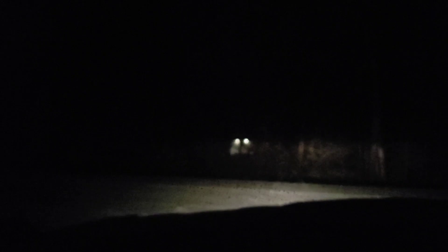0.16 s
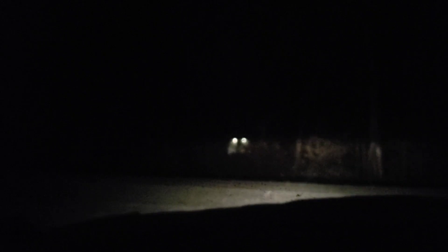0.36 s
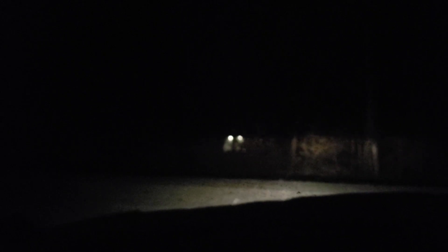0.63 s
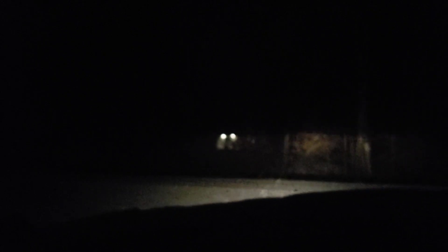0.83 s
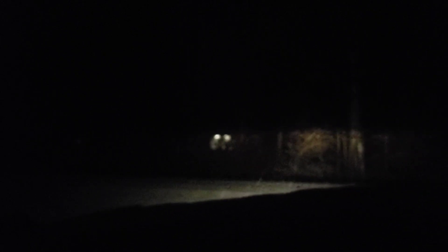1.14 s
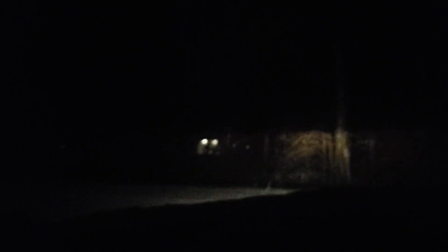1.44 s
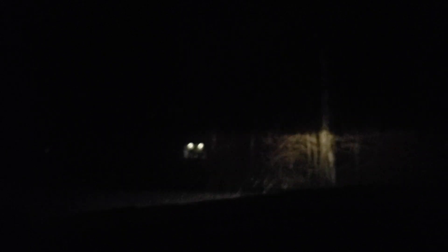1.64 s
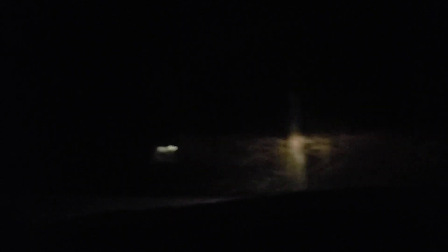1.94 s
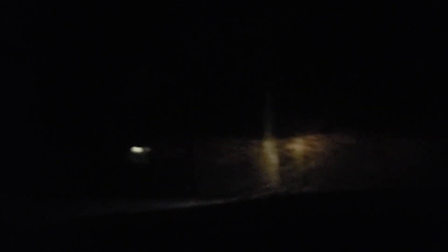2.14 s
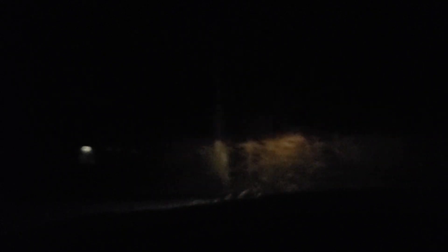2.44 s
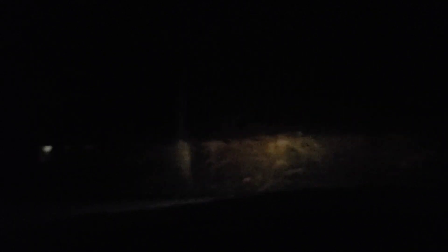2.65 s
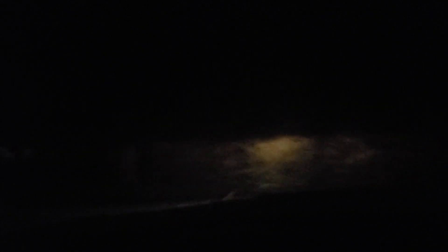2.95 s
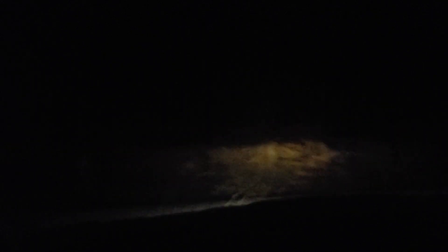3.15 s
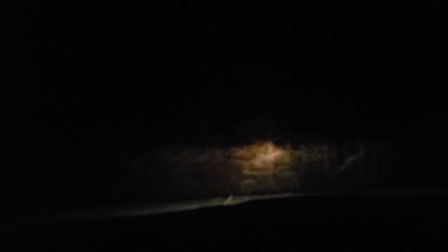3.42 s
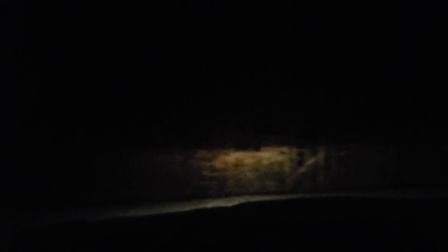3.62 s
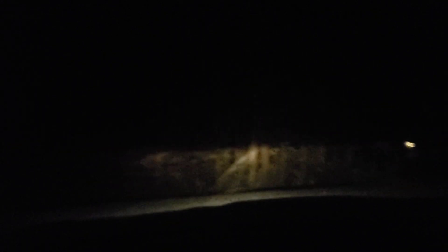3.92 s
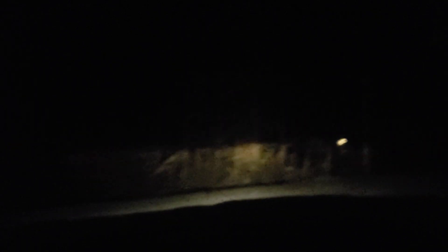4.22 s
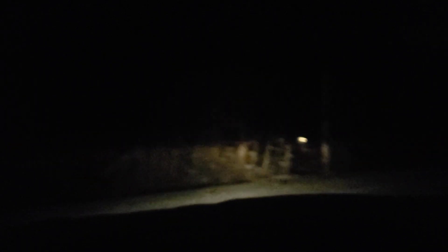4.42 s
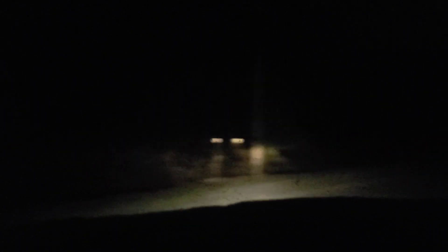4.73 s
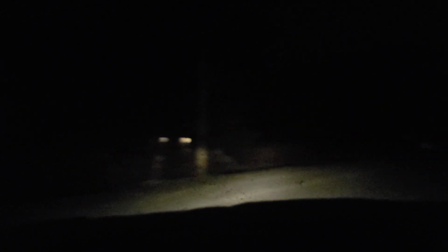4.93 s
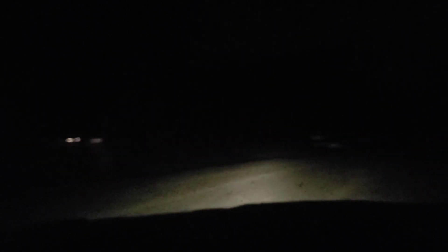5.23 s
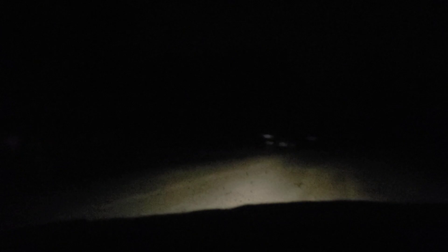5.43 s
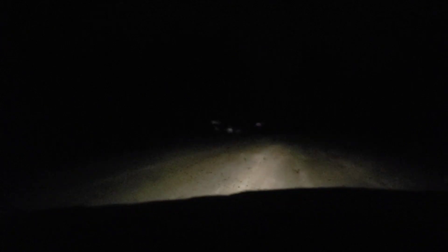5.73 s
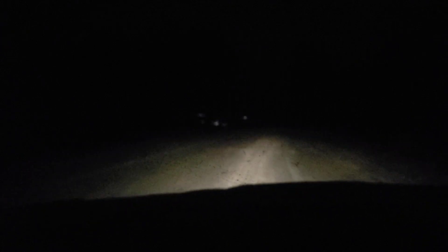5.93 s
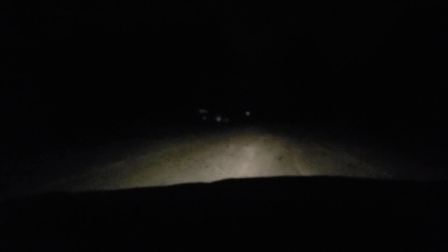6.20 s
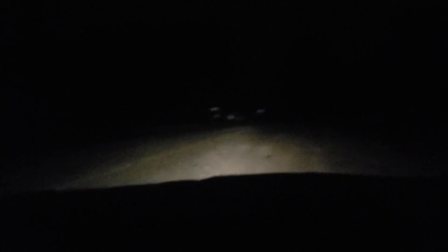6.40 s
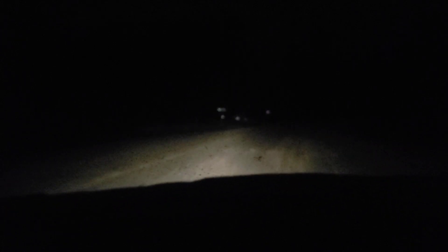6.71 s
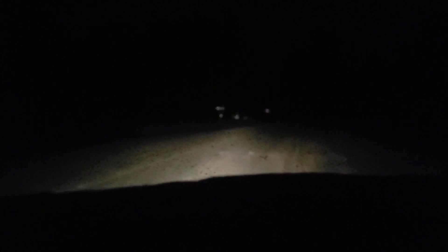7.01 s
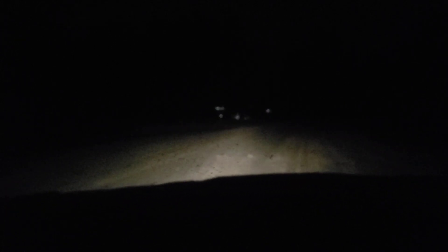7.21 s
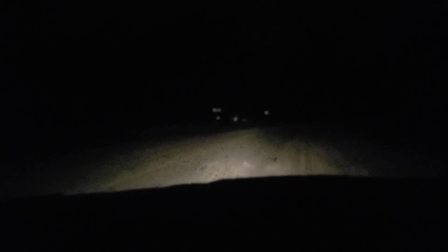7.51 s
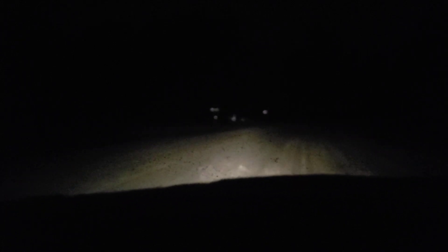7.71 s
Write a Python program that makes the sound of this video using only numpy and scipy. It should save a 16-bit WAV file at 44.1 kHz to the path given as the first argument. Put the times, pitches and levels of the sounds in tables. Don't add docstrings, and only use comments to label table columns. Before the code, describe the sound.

Muffled cabin sound of tyres rumbling and crunching over rutted snow, body thuds, light sleeve rustles, and a sudden hard clatter near five seconds.

```python
import sys
import numpy as np
from scipy import signal
from scipy.fft import rfft, irfft, next_fast_len
from scipy.io import wavfile
from scipy.ndimage import uniform_filter1d

SR = 44100
rng = np.random.default_rng(int(sys.argv[2]) if len(sys.argv) > 2 else 0)


def pcm_store(signal):
    levels = np.round(np.clip(np.atleast_2d(signal), -1, 1) * 32767)
    wavfile.write(sys.argv[1], SR, levels.astype(np.int16).T)


def volts_from_decibels(level):
    exponent = np.asarray(level, float) / 20
    return 10 ** exponent


N = 346626
TIME_S = np.arange(N) / SR
COARSE_S = np.arange(0, N + 40, 40) / SR
LEFT_RIGHT = np.array([[1], [-1]])


def rms_one(x):
    return x / np.sqrt(np.mean(x ** 2) + 1e-20)


def in_time(rows):
    times, *columns = np.transpose(rows)
    return [np.interp(TIME_S, times, column) for column in columns]


def at_hz(points, hz):
    table_hz, values = np.transpose(points)
    return np.interp(np.log(hz), np.log(table_hz), values)


def drift(rate, at=None):
    r = np.exp(-80 * np.pi * rate / SR)
    noise = rng.standard_normal(N // 40 + 2002)
    slow = signal.lfilter([1], [1, -2 * r, r * r], noise)[2000:]
    samples = np.arange(N) if at is None else at
    return np.interp(samples / 40, np.arange(len(slow)), rms_one(slow))


def swells(rows):
    power = 0
    for s, rise, fall, db in rows:
        away = np.where(COARSE_S < s, (s - COARSE_S) / rise, (COARSE_S - s) / fall)
        power = power + volts_from_decibels(2 * db - 40 * away)
    return np.interp(TIME_S, COARSE_S, 10 * np.log10(power + 1e-14))


def strokes(rows, rest_db):
    edge = 3 * .05
    each = []
    for s, length, a, b in rows:
        corners = [s - edge, s, s + length, s + length + edge]
        each.append(np.interp(COARSE_S, corners, [a - 60, a, b, b - 60]))
    return np.interp(TIME_S, COARSE_S, np.maximum(np.max(each, axis=0), rest_db))


def fade(rows, s):
    first, last = rows[0], rows[-1]
    return [(first[0] - s, first[1], -100)] + list(rows) + [(last[0] + s, last[1], -100)]


def glides(rows, edge):
    points = []
    for s, length, from_hz, to_hz, db in rows:
        points += fade([(s, from_hz, db), (s + length, to_hz, db)], edge)
    return in_time(points)


def resonate(x, hz, width_hz):
    r = np.exp(-np.pi * width_hz / SR)
    top = np.array([1, 0, -1]) * (1 - r * r) / 2
    return signal.lfilter(top, [1, -2 * r * np.cos(2 * np.pi * hz / SR), r * r], x)


def tone(hz, wobble, rate):
    turns = np.cumsum(hz * (1 + wobble * drift(rate))) / SR
    return np.sqrt(2) * np.sin(2 * np.pi * turns)


def grit(grain_db, per_s, count=N):
    strength = volts_from_decibels(grain_db * np.minimum(rng.exponential(1, (2, count)), 4))
    sizes = strength * rng.standard_normal((2, count))
    return sizes * (rng.random((2, count)) < per_s / SR) + 1e-9


# f/Hz, likeness (1 same, -1 opposite)
CABIN_LIKENESS = [(60, 0.88), (130, 0.96), (290, 0.71), (640, 0.65), (1410, -0.32), (3100, 0.24),
                  (6820, -0.27), (15000, 0.2)]
# f/Hz, level/dB
LEFT_LEAN = [(60, 2.4), (700, 2), (1300, 1), (2400, 3.5), (4400, 4.5), (8000, 3), (12000, -2), (15000, 2)]


def spread(mid, side, hz, likeness=CABIN_LIKENESS):
    alike = np.clip(at_hz(likeness, hz), -1, 1)
    lean = volts_from_decibels(at_hz(LEFT_LEAN, hz) / 2 * LEFT_RIGHT)
    return lean * (np.sqrt(1 + alike) * mid + np.sqrt(1 - alike) * side * LEFT_RIGHT)


def coloured(source, spectrum, patchy_db, flicker, likeness=CABIN_LIKENESS):
    count = source.shape[1]
    size = next_fast_len(count)
    low_hz, high_hz = spectrum[0][0], spectrum[-2][0]
    short = min(size, 2 * next_fast_len(int(2 * high_hz * size / SR)))
    hz = np.arange(1, short // 2 + 2) * SR / size
    at = np.arange(short) * size / short
    mid, side = rfft(source, size)[:, :len(hz)]
    shaped = volts_from_decibels(at_hz(spectrum, hz)) * spread(mid, side, hz, likeness) * (hz > low_hz)
    shaped = shaped.astype(np.complex64)
    out, together, place = 0, drift(flicker, at), 2 * np.log2(hz)
    for centre in np.arange(2 * np.log2(low_hz), 2 * np.log2(high_hz) + 1):
        share = np.clip(1 - abs(place - centre), 0, 1).astype(np.float32)
        band = irfft(shaped * share, short)
        out = out + volts_from_decibels(patchy_db * (together + drift(flicker, at))) * band
    return rms_one(irfft(rfft(out), size)[:, :count])


# t/s, level/dB
TYRE_LOAD = [(0.0, -57), (0.92, -57), (2.21, -48), (2.53, -49), (2.83, -53), (3.06, -54), (3.5, -49),
             (3.9, -55), (4.18, -56), (4.65, -48), (4.91, -50), (5.5, -51), (5.92, -53.5), (6.35, -58),
             (6.8, -55), (7.51, -57), (7.7, -54)]


def load_db():
    crunch_db, = in_time(TYRE_LOAD)
    return crunch_db - crunch_db.mean()


# t/s, half length/s, extra level/dB
ROUGH_PATCHES = [
    (1.913, 0.051, 6),
    (3.508, 0.058, 1),
    (4.52, 0.052, 3),
    (5.421, 0.025, 4),
    (6.6, .1, 2),
    (5.18, .1, 3),
    (7.841, .03, 3),
]


def rut_db():
    return sum(db * np.exp(-((TIME_S - s) / half) ** 2) for s, half, db in ROUGH_PATCHES)


# t/s, peak level/dB, f/Hz, time to fall 20 dB/s
SHELL_JOLTS = [(.03, -41, 45, .2), (.53, -37, 53, .3), (1.1, -38, 60, .3), (1.35, -32, 56, .2),
               (1.47, -22, 56, .2), (1.77, -17, 60, .06), (1.95, -27, 55, .3), (2.12, -23, 52.5, .12),
               (2.28, -16, 42.3, .06), (2.43, -20, 47, .14), (2.65, -16, 50, .15), (3.02, -30, 57, .2),
               (3.33, -33, 55, .1), (3.48, -16, 56, .2), (3.59, -20, 56, .18), (3.88, -19, 50, .08),
               (4.01, -23, 50.5, .2), (4.33, -20, 52.5, .07), (4.42, -22, 49, .05), (4.72, -22, 43.5, .3),
               (4.78, -15, 43.6, .4), (4.85, -19, 44.5, .1), (4.97, -19, 51.5, .14),
               (5.19, -16.5, 49.5, .22), (5.5, -23, 51, .1), (6.2, -34, 56, .3), (6.55, -29, 64, .3),
               (7.16, -27, 62, .2), (7.5, -28, 56, .3), (7.68, -27, 50.5, .3)]


def body_boom():
    hz, = in_time([(s, hz) for s, db, hz, fall in SHELL_JOLTS])
    jolts_db = swells([(s, .055, fall, db) for s, db, hz, fall in SHELL_JOLTS])
    between_db = -41 + 1.2 * load_db()
    level = volts_from_decibels(jolts_db) + volts_from_decibels(between_db)
    bounce = rms_one(resonate(resonate(rng.standard_normal(N), 36, 7.1), 36, 7.1))
    drumming = tone(hz, 0.0874, 15.2) + volts_from_decibels(-6.5) * bounce
    return spread(level * volts_from_decibels(-5.5) * drumming, 0, hz=50)


# f/Hz, level/dB per Hz
RUMBLE_COLOUR = [(12, -41), (20, -12), (38, -12), (58, 1.5), (107, -2), (161, -11), (193, -14.5),
                 (262, -28.5), (300, -27.5), (390, -35.5), (660, -120)]
# f/Hz, level/dB per Hz
CRUNCH_COLOUR = [(110, -30.5), (180, -2), (297, -9.5), (339, -17), (371, -12), (490, -18), (564, -15),
                 (704, -22.5), (815, -20.5), (950, -31), (1240, -62.5), (2090, -120)]
# f/Hz, width/Hz, level/dB
CABIN_MODES = [(194.5, 11, -6.5), (303.3, 5.3, -7.5), (560, 40, -9), (812, 34, -1)]


def tyres():
    rumble_db = -34.5 + .6 * load_db()
    rumble = coloured(rng.standard_normal((2, N)), RUMBLE_COLOUR, patchy_db=0.78, flicker=9)
    crunch_db, = in_time(TYRE_LOAD)
    crunch = coloured(grit(1.5, 8000), CRUNCH_COLOUR, patchy_db=-0.3, flicker=28)
    crunch = crunch + sum(volts_from_decibels(db + 3.5) * resonate(crunch, hz, width) for hz, width, db in CABIN_MODES)
    return volts_from_decibels(rut_db()) * (volts_from_decibels(rumble_db) * rumble + volts_from_decibels(crunch_db + 7.5) * rms_one(crunch))


# f/Hz, level/dB per Hz
HISS_COLOUR = [(590, -26), (1000, 3), (1530, -24), (1870, -11.5), (3040, -11), (4010, -6), (4450, -19),
               (6750, -19), (8410, -27), (12000, -17), (15200, -14.5), (15900, -26)]
# f/Hz, width/Hz, level/dB
DUCT_NOTES = [(1855, 230, -88), (4000, 260, -86.5), (1140, 45, -88), (715, 70, -70)]


def vents():
    out = volts_from_decibels(-78.5) * coloured(rng.standard_normal((2, N)), HISS_COLOUR, patchy_db=.3, flicker=5)
    air = rng.standard_normal((2, N))
    for hz, width, db in DUCT_NOTES:
        breath = rms_one(resonate(resonate(air, hz, width), hz, width))
        out = out + volts_from_decibels(db + 2.5 * drift(3)) * breath
    return out


# t/s, f/Hz, level/dB
ENGINE_NOTE = [(.68, 92, -42), (1.74, 95.5, -36), (1.96, 86, -32), (2.07, 89, -34), (2.2, 104, -39),
               (2.3, 110, -40), (2.47, 117.3, -34), (2.65, 111, -34), (2.8, 97, -39), (3.14, 86, -47),
               (3.38, 110, -41), (3.5, 117.3, -39), (3.63, 112, -45), (4.08, 75, -41), (4.37, 88, -37.5),
               (4.52, 112, -35), (4.69, 131, -36), (5.01, 118, -40), (5.4, 126, -40), (5.55, 125, -43),
               (5.7, 120, -43), (5.9, 110.5, -42), (6.04, 107.5, -42), (6.2, 91, -43)]
# start t/s, length/s, level/dB
PUMP_WHINES = [
    (2.02, .76, -58.5),
    (3.2, .54, -59),
    (5.1, .4, -66),
    (5.5, .64, -60.5),
]
# start t/s, length/s, from f/Hz, to f/Hz, level/dB
SHAFT_HUMS = [(0, .08, 147, 147, -43), (1.45, .25, 190, 194, -45), (1.88, .1, 195, 195, -43),
              (2.18, .1, 150, 148, -39), (2.22, .06, 310, 310, -49), (2.03, .72, 97, 104, -32),
              (7.05, .2, 82, 84, -35), (5.28, .15, 367, 367, -55), (5.55, .25, 367, 374, -59),
              (6.5, .45, 292, 296, -60), (7.2, .6, 282, 303, -58), (7.55, .27, 812, 835, -62)]
# start t/s, length/s, from f/Hz, to f/Hz, level/dB
GEAR_SONG = (5.66, .24, 855, 770, -64.5)


def drivetrain():
    revs, level_db = in_time(fade(ENGINE_NOTE, 0.6))
    out = spread(volts_from_decibels(level_db - 2 + 3 * drift(9)) * tone(revs, .02, 8), 0, hz=110)
    whines = [glides([(s, length, 0, 0, db)], .15)[1] for s, length, db in PUMP_WHINES]
    whine_db = np.max(whines, axis=0)
    pump = tone(5.45 * uniform_filter1d(revs, size=3000), .005, 15)
    out += spread(volts_from_decibels(whine_db + 1.3 * drift(10)) * pump, 0, hz=600)
    for row in SHAFT_HUMS + [GEAR_SONG]:
        start_hz = row[2]
        hz, level_db = glides([row], .15)
        hum = tone(hz, .003 + 2.5 / start_hz, 15)
        out += spread(volts_from_decibels(level_db + drift(10)) * hum, 0, hz=start_hz)
    return out


# start t/s, length/s, start level/dB, end level/dB, added brightness level/dB
SLEEVE_STROKES = [(0, .2, -70, -88, -8), (.25, .5, -86, -64, -9), (.75, .52, -63.5, -80, -11),
                  (1.2, .13, -80, -76, -6), (1.33, .13, -66.5, -68, -11), (1.45, .13, -68, -59, 0),
                  (1.58, .1, -59, -60, 1.5), (1.68, .11, -60, -78, -1), (1.8, .37, -80, -73, 3),
                  (2.17, .15, -75, -63, 1), (2.32, .1, -63, -65, -1), (3.29, .18, -71, -61.5, 1),
                  (3.47, .29, -61.5, -75, 1), (3.885, .1, -67, -85, -7), (4.05, .17, -87, -75.5, -9),
                  (4.22, .2, -75.5, -87, -11), (4.49, .2, -71, -65, -7), (4.58, .3, -72, -70, 8),
                  (4.69, .3, -63, -67, -1), (5.03, .05, -60, -62, -3), (5.13, .11, -69, -69, 6),
                  (5.24, .08, -73, -78, -2), (5.33, .04, -68, -68, 5), (5.38, .17, -68, -76.5, -3),
                  (5.55, .17, -76, -71, -5), (5.72, .25, -71, -76, -6), (5.95, .2, -76, -74, -2)]
# start t/s, length/s, start level/dB, end level/dB, added brightness level/dB
SMALL_STROKES = [
    (6.15, .15, -86, -86, 0),
    (6.31, .29, -76, -72, -5),
    (6.63, .03, -78, -80, 4),
    (6.68, .34, -77, -73, 0),
    (7.02, .8, -75, -90, -1),
    (7.855, .02, -73, -73, 0),
]
# t/s, time to rise 20 dB/s, time to fall 20 dB/s, level/dB
SEAT_CREAKS = [
    (.5, .8, 1, -76),
    (.8, .8, 1.2, -73),
    (1.8, 1.2, 2.5, -74),
    (2.5, 1, 1.5, -78),
    (3.5, 1.2, 1.5, -74),
    (4.7, 1.5, 2, -75),
    (5.28, 1.5, 1.3, -70),
    (6.7, 3, 3, -83),
    (7.8, 3, 1, -80),
]
# f/Hz, level/dB per Hz
RUB_COLOUR = [(2000, -30), (2800, -4), (4500, 2.5), (6000, 1), (7500, 0), (8500, -15), (11000, -48)]
# f/Hz, level/dB per Hz
FINE_COLOUR = [(6000, -29), (7500, -13), (9000, -1), (12000, 6), (13500, 1), (15200, 1), (15900, -7),
               (17000, -10)]
# f/Hz, level/dB per Hz
SPRAY_COLOUR = [(800, -22), (950, 2), (1150, 2), (1400, -5), (1700, -12.5), (2800, -29.5), (4000, -64.5)]
# f/Hz, level/dB per Hz
SEAT_COLOUR = [(1200, -28.5), (1600, -3.5), (1950, 5.5), (2300, -2), (2700, -6.5), (3000, -34.5),
               (4000, -60)]


def cloth():
    rows, rest_db = SLEEVE_STROKES + SMALL_STROKES, -94
    rub_db = strokes([row[:-1] for row in rows], rest_db)
    brighter = [(s, length, a + tilt_db, b + tilt_db) for s, length, a, b, tilt_db in rows]
    fine_db = strokes(brighter, rest_db - 9.0)
    revs = in_time(ENGINE_NOTE)[0]
    spray_db = -71 + 1.0 * load_db() + .16 * (revs - 103)
    fibres = grit(1, 20000)
    out = volts_from_decibels(rub_db) * coloured(fibres, RUB_COLOUR, patchy_db=.5, flicker=8)
    out += volts_from_decibels(fine_db) * coloured(fibres, FINE_COLOUR, patchy_db=.4, flicker=6)
    out += volts_from_decibels(spray_db + 1.3 * rut_db()) * coloured(fibres, SPRAY_COLOUR, patchy_db=1.8, flicker=14)
    seat = coloured(fibres, SEAT_COLOUR, patchy_db=0.14, flicker=12)
    seat = rms_one(seat + volts_from_decibels(1.5) * resonate(seat, 1930, 260))
    return out + volts_from_decibels(swells(SEAT_CREAKS)) * seat * volts_from_decibels(1.5)


# t/s, centre f/Hz, level/dB
GLOVE_SLIDES = [(.33, 7500, -92), (.42, 7450, -77), (.52, 7000, -79), (.56, 5200, -80), (.66, 4800, -72),
                (.73, 4500, -61), (.83, 4750, -63), (.87, 4750, -72), (1.06, 4900, -78), (1.15, 4900, -100),
                (5.8, 4620, -100), (5.86, 4620, -75), (5.96, 4680, -76), (6.02, 4680, -100),
                (6.26, 2800, -100), (6.3, 2900, -74), (6.4, 3600, -75), (6.45, 4100, -69), (6.5, 4300, -70),
                (6.57, 4400, -66), (6.62, 4400, -80), (6.7, 4600, -86), (6.85, 4100, -76),
                (6.95, 4600, -82), (7.0, 5200, -76), (7.12, 4600, -84), (7.3, 4600, -100)]


def glove():
    hz, level_db = in_time(GLOVE_SLIDES)
    low_pass = signal.butter(2, 520, fs=SR, output="sos")
    slow = signal.sosfilt(low_pass, rng.standard_normal((2, 2, N)))
    turn = 2 * np.pi * np.cumsum(hz) / SR
    swish = rms_one(slow[0] * np.cos(turn) + slow[1] * np.sin(turn))
    return volts_from_decibels(level_db + 1.5 * drift(30)) * swish * volts_from_decibels(3.0 * LEFT_RIGHT)


# t/s, peak level/dB, ring f/Hz,
# overtone f/Hz, left over right level/dB
TRIM_TICKS = [(1.317, -66, 4400, 6500, 8), (3.847, -43, 980, 1760, 1.5), (3.8485, -47, 1150, 2060, 1.5),
              (4.7525, -36, 800, 1200, -3), (4.772, -39, 1200, 3000, -3), (5.069, -56, 2900, 4100, -1),
              (5.439, -47, 1130, 3200, 5.5), (5.4395, -50, 1450, 2700, 5.5), (5.707, -55, 1800, 4300, 5),
              (5.7075, -53, 1400, 4300, 5), (6.2996, -62, 2746, 2900, 8), (6.614, -55, 1100, 1500, 12),
              (6.6145, -57, 1450, 4800, 6), (6.79, -63, 2200, 3200, 6), (6.84, -60, 1768, 4100, 8),
              (6.85, -61, 1300, 1900, 8)]
# t/s, peak level/dB, centre f/Hz,
# width/Hz
BRIGHT_SNAPS = [(3.846, -60, 8000, 6000), (1.3174, -63, 4500, 5000), (4.6764, -56, 5700, 3000),
                (4.7386, -50, 5400, 3000), (4.757, -50, 11700, 1200), (4.771, -46, 9000, 6000),
                (4.772, -45, 11800, 1200), (4.8, -51, 11800, 1500), (5.1078, -58, 10300, 4500),
                (5.188, -44, 15100, 1500), (5.1885, -48, 10000, 9000), (5.2202, -49, 12200, 1800),
                (5.2236, -44, 12200, 1800), (5.228, -57, 11500, 3500), (5.3108, -60, 12200, 3500),
                (5.707, -59, 4300, 7000), (5.9753, -67, 12900, 4500), (6.556, -75, 11000, 6000),
                (6.6144, -67, 6000, 6000), (6.619, -61, 10800, 2500), (6.655, -73, 11000, 5000),
                (6.728, -71, 11000, 5000), (6.79, -70, 4500, 3000), (6.99, -70, 5200, 2500),
                (7.553, -72, 9200, 700)]
# t/s, peak level/dB
GLOVE_CATCHES = [
    (0.8744, -58),
    (0.8954, -56),
    (0.9168, -57),
    (0.9423, -54),
    (0.9717, -58),
    (1.0076, -55),
    (1.0494, -67),
]


def ticks():
    out, t = np.zeros((2, N + 4000)), np.arange(4000) / SR
    ring_t60_s, snap_t60_s = .07, .05
    for s, peak_db, ring_hz, high_hz, pan_db in TRIM_TICKS:
        buzz = .2 * rng.standard_normal((2, len(t))) * volts_from_decibels(-60 * t / ring_t60_s)
        hit = buzz + (t == 0)
        for hz, width, db in (ring_hz, 140, 0), (high_hz, 500, -6):
            ringing = resonate(resonate(hit, hz, width), hz, 3 * width)
            level = volts_from_decibels(peak_db + db + pan_db / 2 * LEFT_RIGHT)
            out[:, round(s * SR):][:, :len(t)] += ringing / abs(ringing).max() * level
    catches = [(s, db - 8, 5100, 1700) for s, db in GLOVE_CATCHES]
    for s, snap_db, hz, width in BRIGHT_SNAPS + catches:
        noise = rng.standard_normal((2, len(t)))
        snap = rms_one(resonate(resonate(noise, hz, width), hz, 2 * width))
        lean = volts_from_decibels(at_hz(LEFT_LEAN, hz) / 2 * LEFT_RIGHT)
        out[:, round(s * SR):][:, :len(t)] += lean * snap * volts_from_decibels(snap_db - 60 * t / snap_t60_s)
    return out[:, :N]


# t/s, time to rise 20 dB/s, time to fall 20 dB/s, level/dB
BUMP_LURCHES = [
    (4.718, .008, .07, -46),
    (4.754, .008, .05, -29),
    (4.775, .015, .05, -28),
    (4.802, .07, .024, -35),
]
# t/s, level/dB
HARD_BLOWS = [
    (4.7525, -11),
    (4.7615, -15),
    (4.7715, -4),
    (4.779, -15),
    (4.789, -12),
    (4.803, -15),
]
# f/Hz, width/Hz, level/dB
LOOSE_MODES = [(140, 50, -1), (190, 50, 2), (280, 60, -3), (404, 60, 6), (510, 70, -6), (700, 80, -7),
               (810, 70, -4), (1230, 220, -2)]
# f/Hz, level/dB per Hz
CRACK_COLOUR = [(700, -30.5), (1000, -6), (1300, 1), (2000, -1), (3000, -4), (4200, -14), (6000, -18),
                (7500, -24), (10000, -57)]
# f/Hz, likeness
RATTLE_LIKENESS = [(60, .95), (200, .8), (380, .65), (700, .1), (1300, 0)]


def bump():
    from_s, to_s = 4.5, 5.2
    out, span = np.zeros((2, N)), slice(round(from_s * SR), round(to_s * SR))
    early = [(s, rise + .015, fall, db) for s, rise, fall, db in BUMP_LURCHES]
    early_db = swells(early)[span] + 30
    chatter = grit(1.5, 8000, count=len(early_db))
    blows = volts_from_decibels(swells(BUMP_LURCHES)[span]) * rms_one(chatter)
    for s, db in HARD_BLOWS:
        blows[:, round((s - from_s) * SR)] += volts_from_decibels(db) * np.array([1, .5])
    blows = signal.sosfilt(signal.butter(2, 1000, fs=SR, output="sos"), blows)
    modes = 0
    for hz, width, db in LOOSE_MODES:
        mid, side = resonate(blows, hz, width)
        modes = modes + volts_from_decibels(db + 17) * spread(mid, side, hz, RATTLE_LIKENESS)
    crack = coloured(chatter, CRACK_COLOUR, patchy_db=1, flicker=60, likeness=RATTLE_LIKENESS)
    sizzle = coloured(chatter, FINE_COLOUR, patchy_db=1, flicker=60)
    out[:, span] = modes + volts_from_decibels(-33.5 + early_db) * crack + volts_from_decibels(-52 + 1.5 * early_db) * sizzle
    return out


def scene():
    return body_boom() + tyres() + vents() + drivetrain() + cloth() + glove() + ticks() + bump()


def top_cut(x):
    return signal.sosfilt(signal.butter(12, 16300, fs=SR, output="sos"), x)


def record(dry):
    low_pass = signal.ellip(12, .5, 60, 15800, fs=SR, output="sos")
    mix = signal.sosfilt(low_pass, dry)
    return top_cut(mix)


dry = scene()
out = record(dry)
pcm_store(out)
```